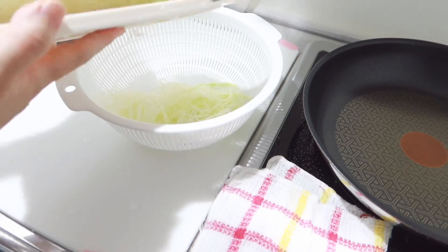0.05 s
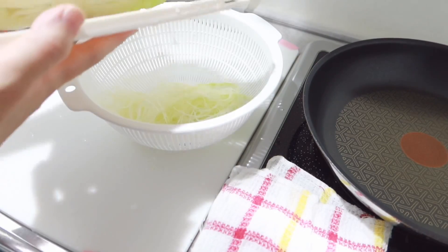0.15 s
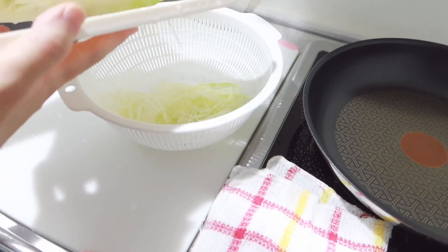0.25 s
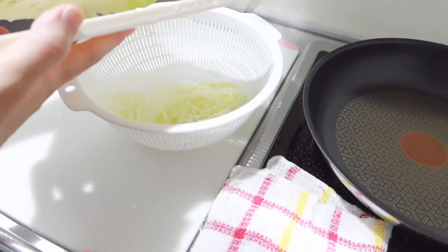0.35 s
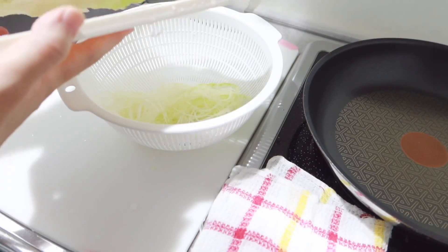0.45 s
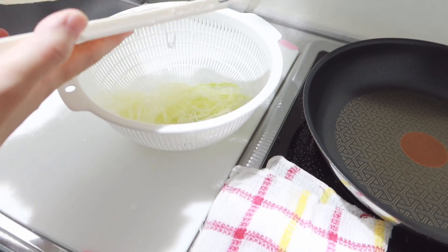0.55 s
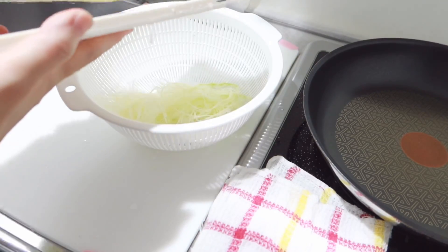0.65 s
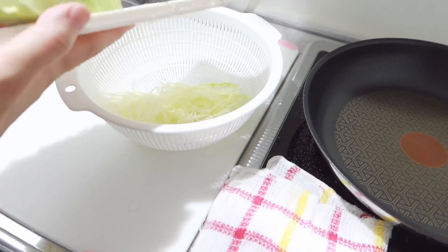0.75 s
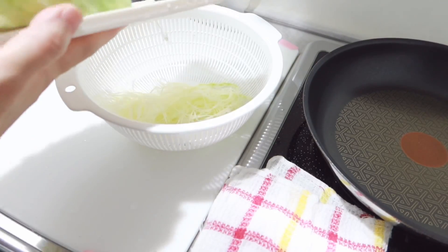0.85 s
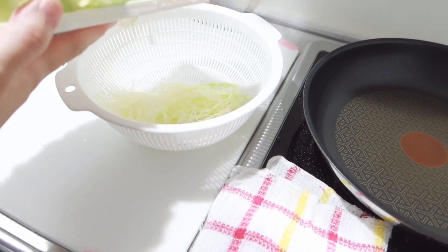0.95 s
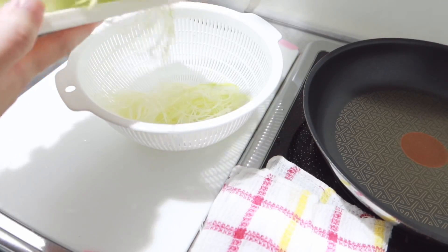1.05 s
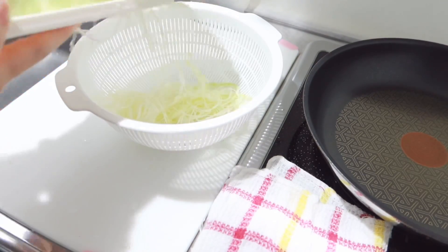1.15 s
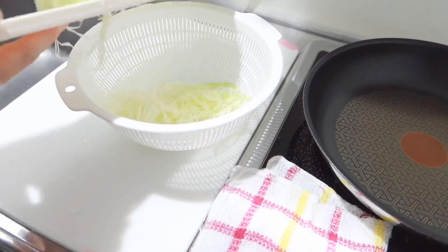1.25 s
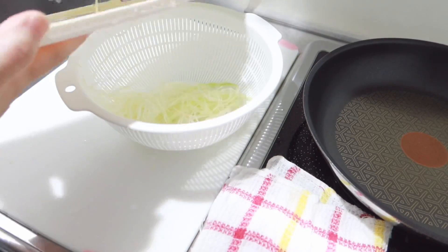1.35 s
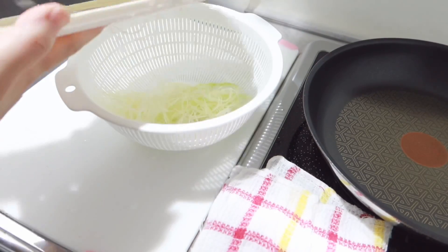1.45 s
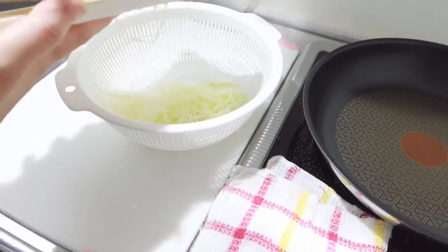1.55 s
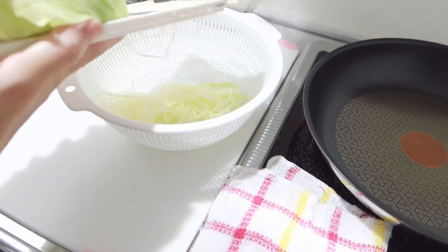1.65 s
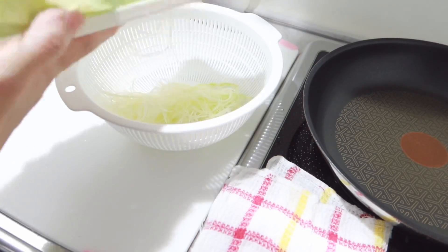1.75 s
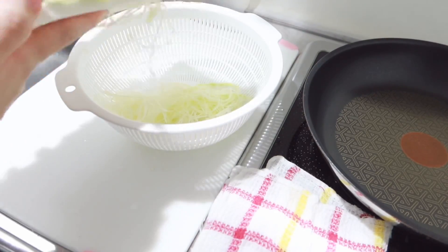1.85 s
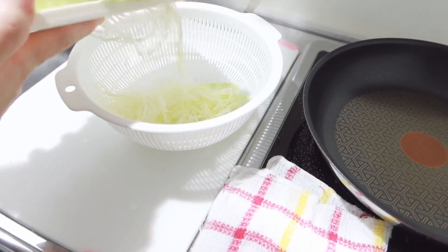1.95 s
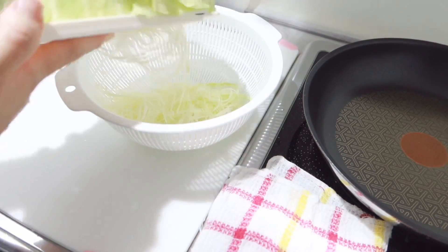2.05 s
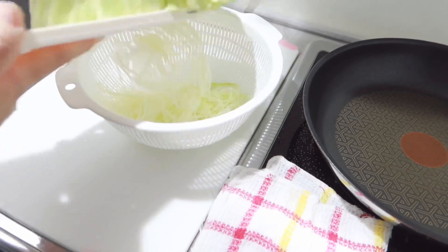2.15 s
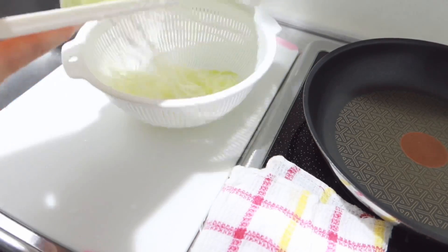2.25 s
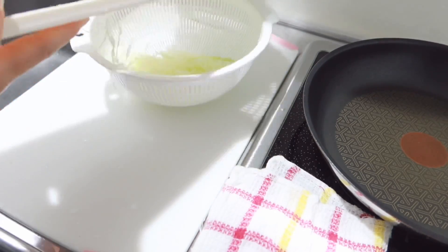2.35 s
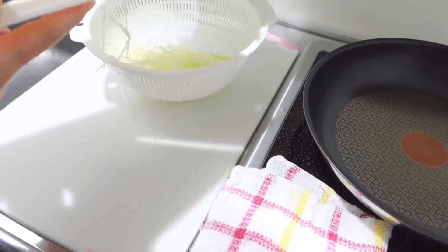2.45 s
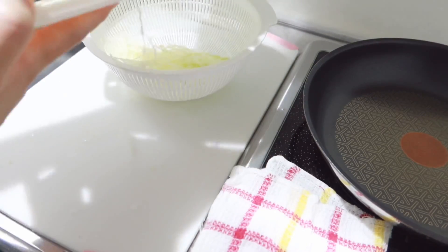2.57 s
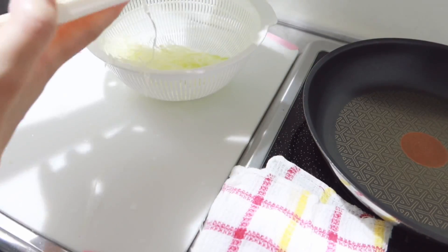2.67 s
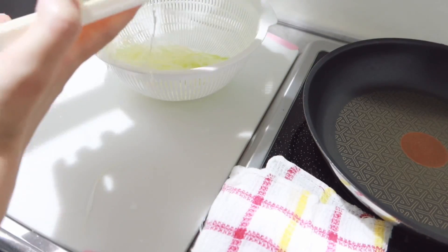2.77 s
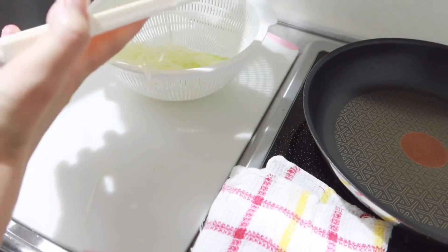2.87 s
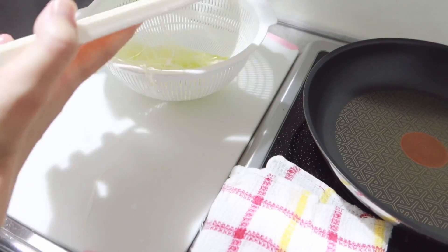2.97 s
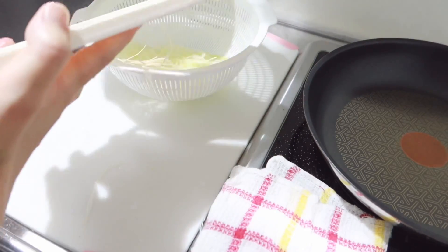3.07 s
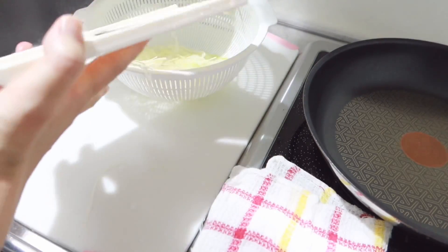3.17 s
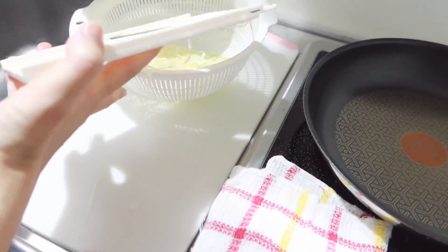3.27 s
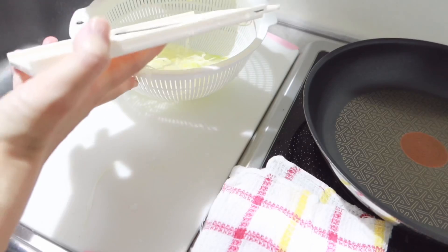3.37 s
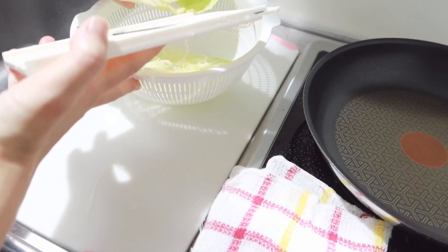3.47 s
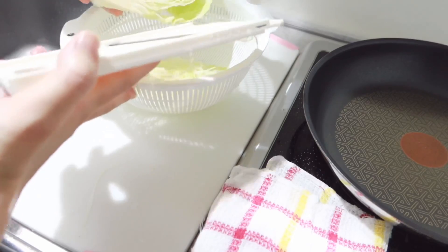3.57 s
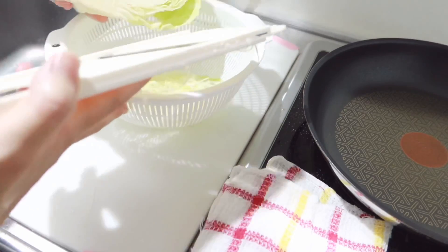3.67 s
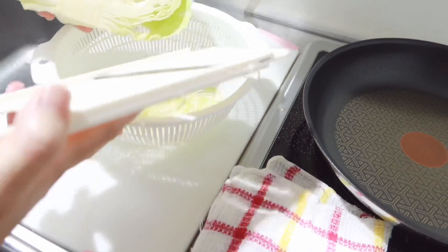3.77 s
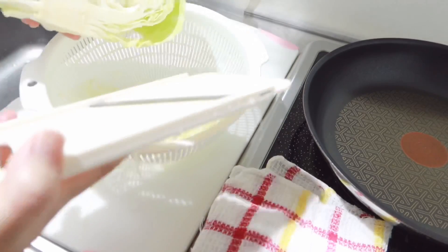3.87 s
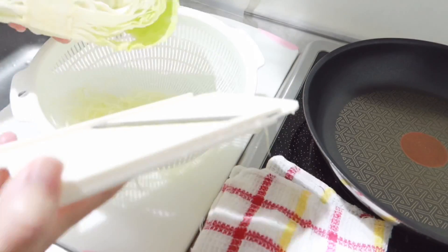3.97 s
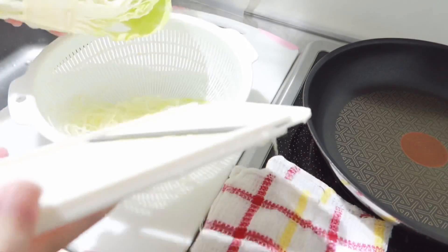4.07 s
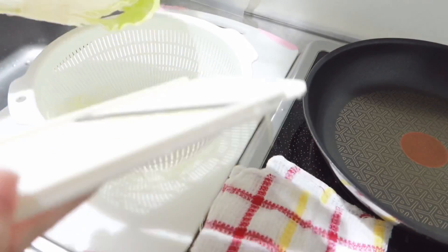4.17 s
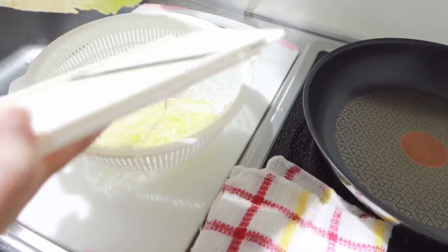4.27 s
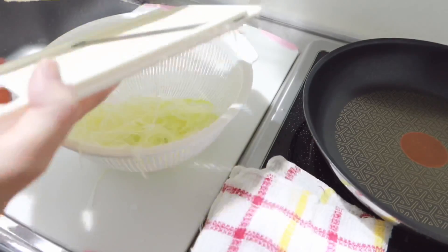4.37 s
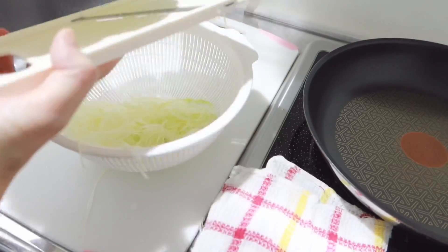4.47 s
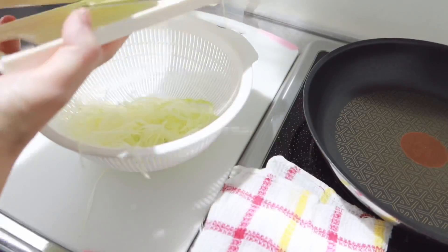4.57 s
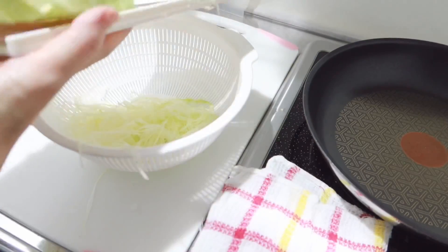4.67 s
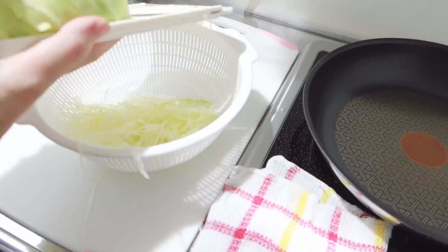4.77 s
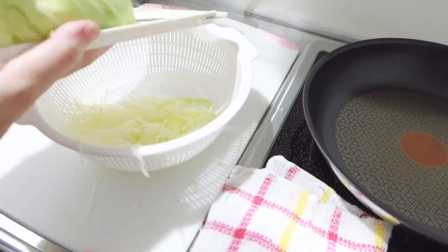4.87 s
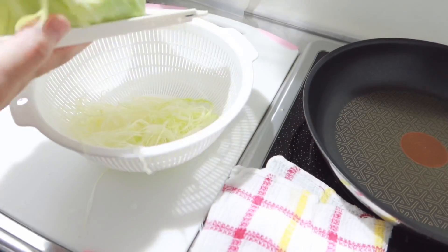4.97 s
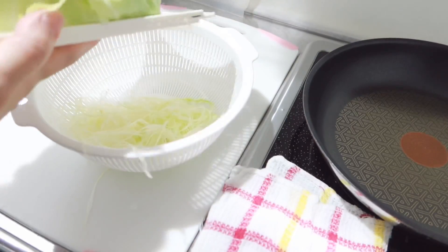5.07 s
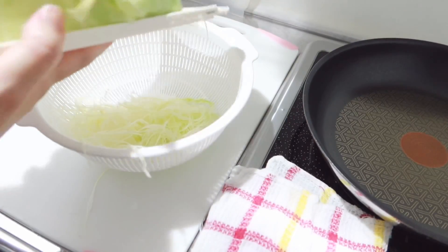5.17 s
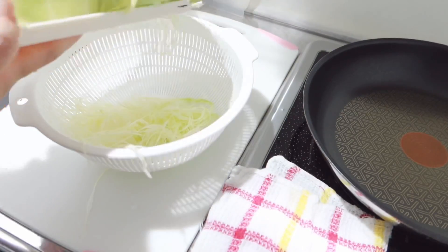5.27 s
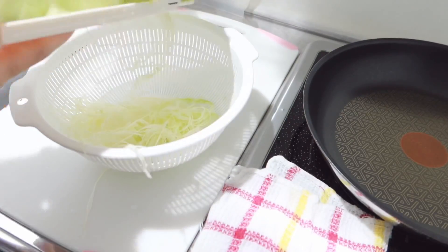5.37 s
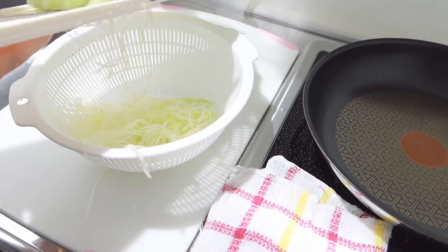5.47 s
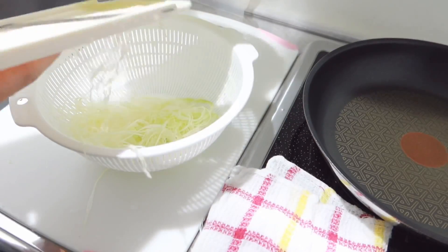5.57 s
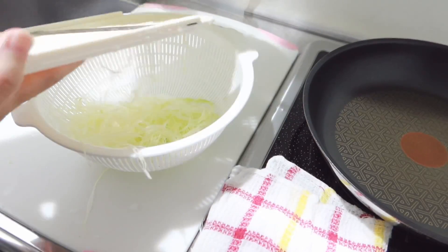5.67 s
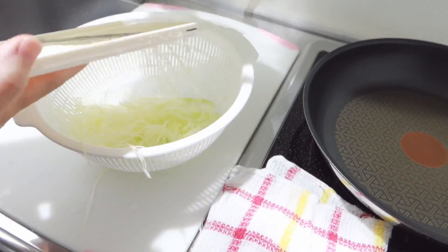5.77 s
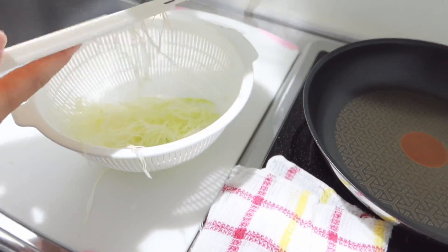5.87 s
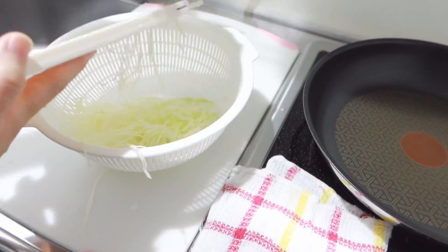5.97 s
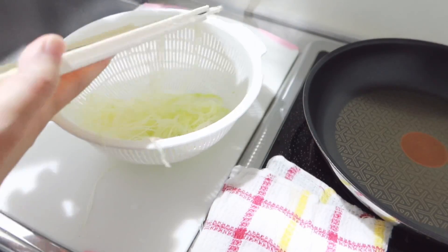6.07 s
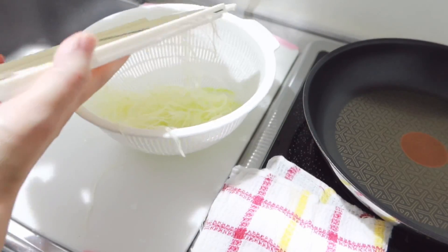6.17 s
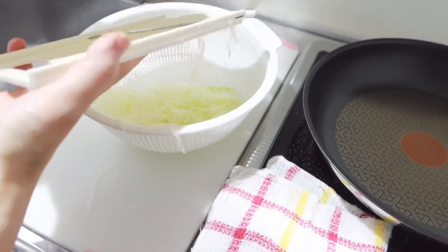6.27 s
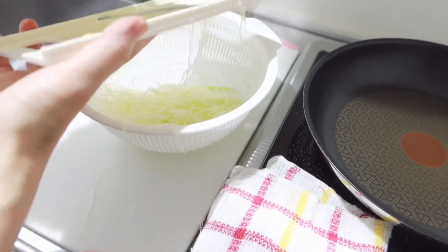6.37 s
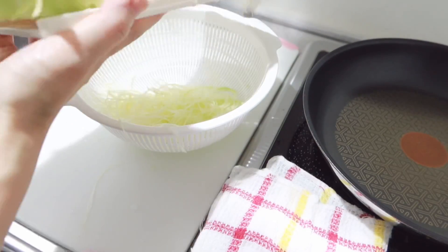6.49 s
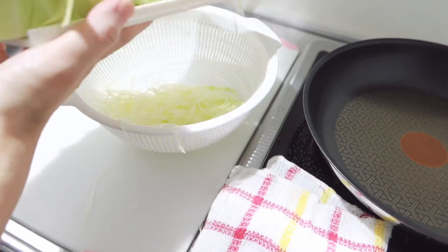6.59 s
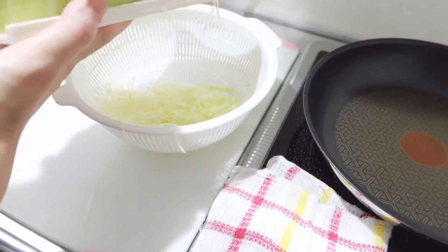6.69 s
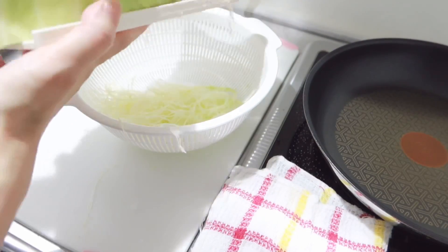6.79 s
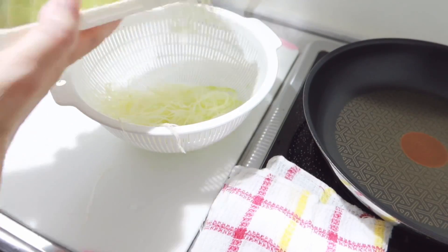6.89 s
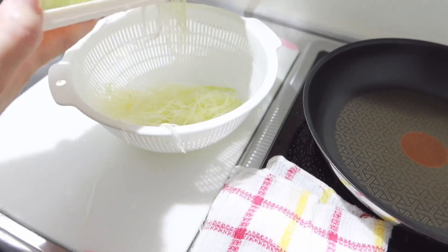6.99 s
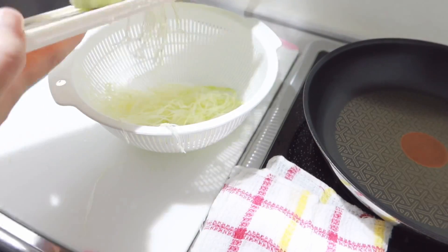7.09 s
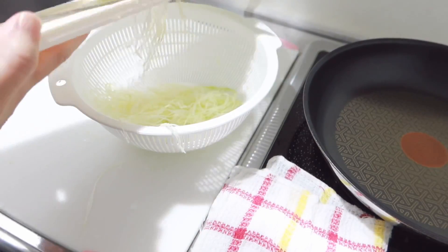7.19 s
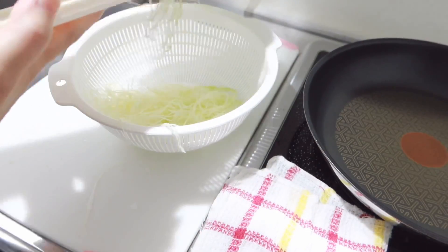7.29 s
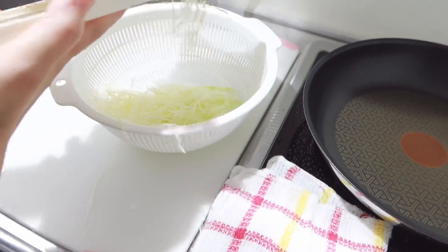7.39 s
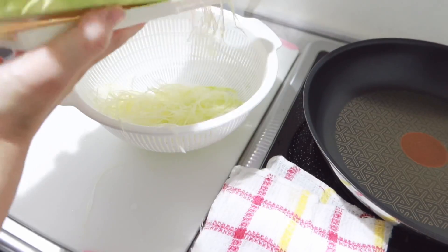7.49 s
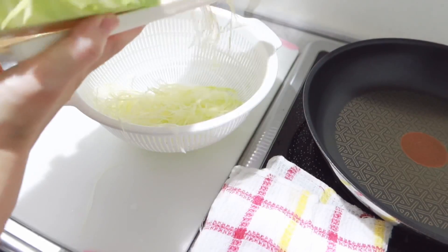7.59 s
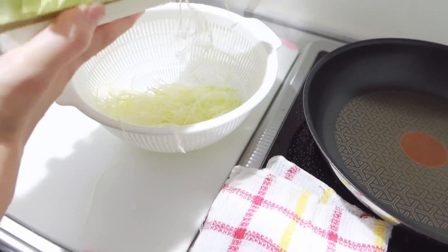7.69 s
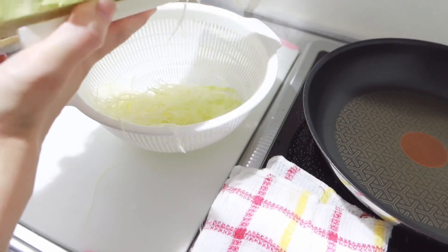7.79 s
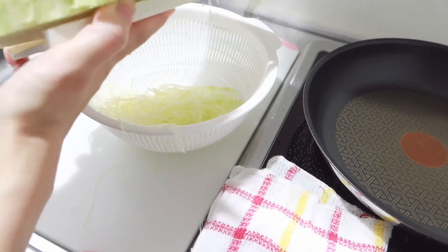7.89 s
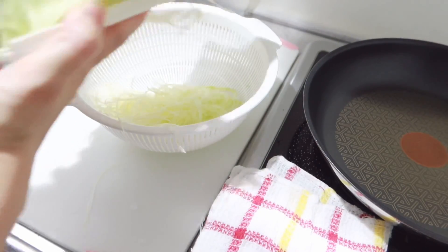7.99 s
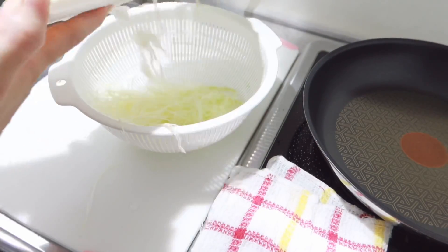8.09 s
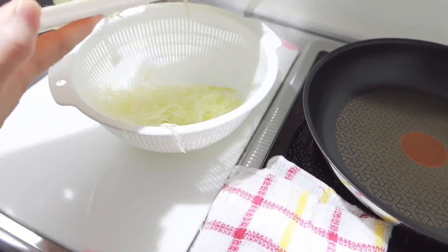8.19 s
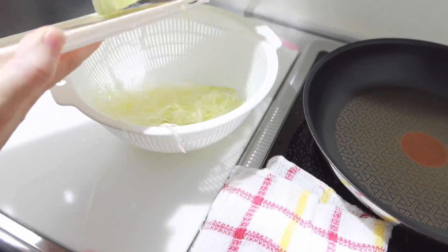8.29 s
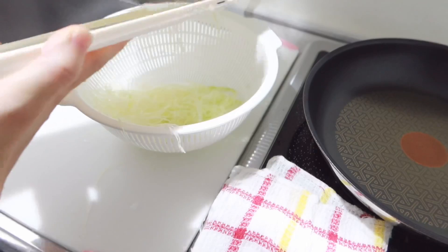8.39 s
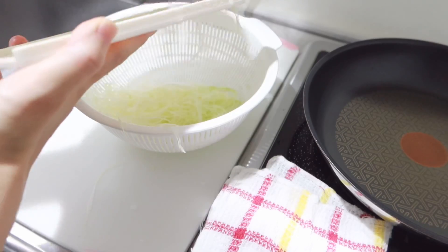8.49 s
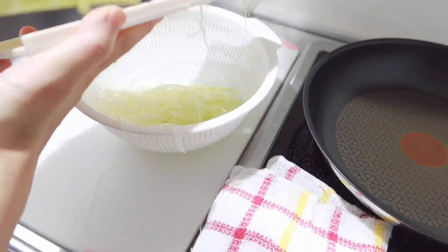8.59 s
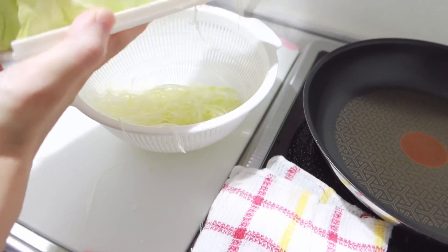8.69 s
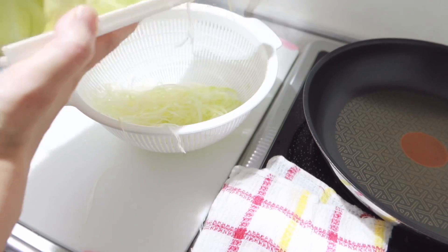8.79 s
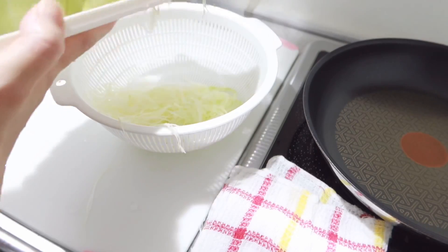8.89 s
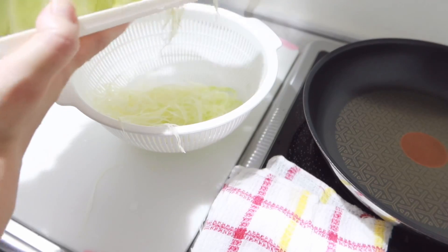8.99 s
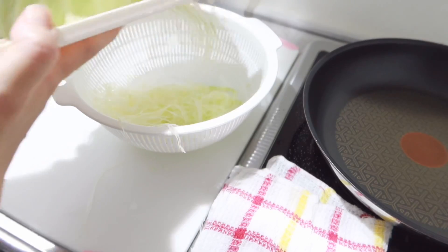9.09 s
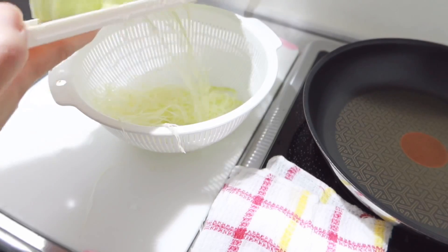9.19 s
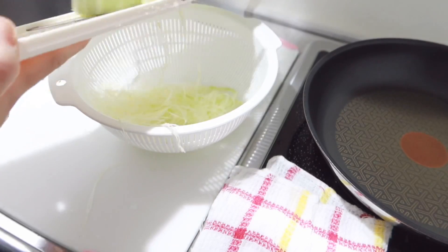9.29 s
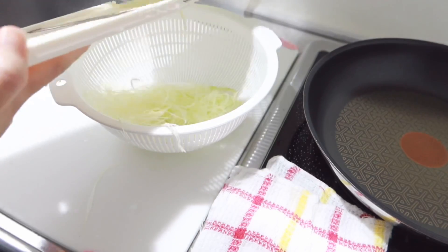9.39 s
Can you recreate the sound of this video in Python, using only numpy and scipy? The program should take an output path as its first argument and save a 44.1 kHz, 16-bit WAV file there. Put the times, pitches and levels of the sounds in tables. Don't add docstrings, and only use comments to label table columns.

```python
import sys
import numpy as np
from scipy import signal
from scipy.fft import rfft, irfft, next_fast_len
from scipy.io import wavfile
from scipy.ndimage import uniform_filter1d

SR = 44100
rng = np.random.default_rng(int(sys.argv[2]) if len(sys.argv) > 2 else 0)


def magnitude_from_level(level_db):
    exponent = np.asarray(level_db, float) / 20
    return 10 ** exponent


def output_pcm(signal):
    pcm = np.clip(np.atleast_2d(signal).T, -1, 1) * 32767
    wavfile.write(sys.argv[1], SR, np.round(pcm).astype(np.int16))


N = 416304

# frequency in Hz, level in dB per Hz.
ROOM_COLOUR = [(25, -33), (50, -14), (75, -8), (110, -12.5), (160, -10), (300, -12), (670, -17.5),
               (760, -21.5), (1200, -22), (2000, -26), (4000, -35), (11800, -50), (15000, -53.5)]
# frequency in Hz, width in Hz, level in dB.
CORNER_MODES = [(1158, 34.7, -75), (1640, 59, -75)]
# frequency in Hz, level in dB.
FRIDGE_TONES = [(59.1, -72), (73.8, -64.5), (147.7, -70), (246, -78), (295, -92)]
# time in seconds, level in dB.
FRIDGE_LEVEL = [(0, -61), (3, -61.5), (6, -64), (7.5, -67), (9.44, -65.5)]
# frequency in Hz, likeness from 0 to 1.
ROOM_LIKENESS = [(150, 0.971), (300, 0.742), (1400, 0.782), (3100, 0.44), (6800, 0.14), (15000, .1)]
# frequency in Hz, likeness from 0 to 1.
CLOSE_LIKENESS = [(150, .998), (300, .978), (700, .992), (1500, .99), (2800, .9), (6000, .7), (15000, .55)]
# frequency in Hz, lead in radians.
LEFT_LEAD = [(1500, 0.), (3000, .2), (5000, .55), (7400, .8), (9500, 1.5), (12300, 2.1), (15000, 2.7)]
# frequency in Hz, left over right in dB.
LEFT_LOUDER = [(300, .7), (1300, 1), (3000, 2.8), (5000, 2.6), (9000, 1), (15000, .1)]
# time in seconds, peak in dB, ring in Hz, ring over the crack in dB.
SNAPS = [(0.0044, -34.5, 5290, -1.5), (0.236, -36, 2470, 2.5), (0.3522, -47, 3900, 1.5),
         (0.387, -43.5, 3710, 16), (0.634, -52, 1630, -12.5), (0.7111, -30, 1630, 4.5),
         (1.245, -34.5, 1976, 18.5), (1.5524, -31, 1780, 12), (1.591, -31.5, 3480, 13),
         (1.6165, -31.5, 2370, 13), (1.8253, -26, 5600, -4), (2.7594, -52.5, 1720, -6.5),
         (3.3474, -48, 4220, 0.5), (3.988, -25.5, 2130, -12), (4.0655, -34, 1095, 10.5),
         (4.2936, -48.5, 2190, -14), (4.606, -40, 1640, 18.5), (4.8005, -34.5, 1670, -11.5),
         (4.8767, -34, 3100, 9), (5.1399, -21, 2645, 4.5), (5.3444, -54, 2200, 11),
         (6.7742, -24, 1640, -19.5), (7.9689, -22, 2790, 7.5), (7.994, -42, 2650, -3.5),
         (8.261, -32, 2800, -0.5), (8.7408, -24, 1885, 2), (9.2976, -39, 6000, 0), (9.4106, -53.5, 5600, 0)]
# frequency in Hz, level in dB per Hz.
LEAF_COLOUR = [(88, -55.5), (150, -5), (263, -22.5), (308, 2.5), (388, -9), (540, -10), (827, -5),
               (1110, -14), (1700, -2.5), (12000, -25), (15500, -21)]
# frequency in Hz, width in Hz, level in dB.
BOARD_MODES = [(330, 23.7, 8.5), (553.6, 60.5, 16), (653, 13.3, 1), (1150, 198, 10.5), (1700, 38, 1.5),
               (2280, 87, 0)]
# start, hold and release in seconds, force in dB, board boom in dB.
BITES = [(0.691, 0.0098, 0.097, -47.5, 2), (0.777, 0.209, 0.253, -42, -3), (1.55, 0.0081, 0.064, -45, -6.5),
         (1.683, 0.051, 0.041, -41.5, -5), (1.739, 0.1002, 0.104, -38.5, -2.5),
         (4.747, 0.0263, 0.034, -49, 0.5), (4.821, 0.00397, 0.074, -38.5, -3),
         (4.874, 0.1208, 0.0353, -41, -6), (5.138, 0.0569, 0.0375, -42.5, -1),
         (1.589, 0.0277, 0.0444, -49, 0.5), (6.772, 0.00856, 0.143, -38, -6), (7.601, 0.0151, .06, -43, -6),
         (7.805, 0.03, 0.0232, -49.5, -8.5), (7.871, 0.036, 0.0265, -50, -7),
         (7.91, 0.0375, 0.077, -34, -12), (8.595, 0.0376, 0.0211, -43, -10.5),
         (9.013, 0.00994, 0.268, -44.5, -10.5)]
# time in
# seconds, peak in dB, pitch in Hz.
THUDS = [(0.692, -42.5, 176), (1.551, -40.5, 329.5), (4.825, -34, 337), (5.14, -34.5, 430),
         (6.417, -36.5, 258), (6.775, -43.5, 540), (8.238, -40.5, 369.4), (8.597, -31, 487),
         (9.015, -41, 515), (2.243, -34, 235), (2.266, -29, 200), (2.31, -37, 239), (3.886, -40, 160),
         (3.93, -36.5, 150), (4.055, -39, 189), (4.801, -39, 230)]
# time in seconds, peak in dB, pitch in Hz, time to die by 60 dB in seconds.
BUMPS = [
    (1.548, -44.5, 212, 0.128),
    (2.299, -40, 63.5, 0.194),
    (4.03, -46.5, 62, 0.32),
    (8.599, -38.5, 149, 0.068),
    (9.016, -44, 131.6, 0.103),
    (6.09, -48, 94.3, 0.28),
]
# start and length in seconds, level in dB, middle pitch in Hz.
RASPS = [(0.697, 0.016, -62.5, 7000), (0.772, 0.035, -59, 4730), (1.586, 0.0339, -45, 3870),
         (1.743, 0.044, -49.5, 10500), (2.097, .15, -56, 9000), (4.858, 0.05, -46.5, 4920),
         (4.947, 0.0596, -46, 5800), (4.977, 0.0212, -39.5, 2100), (5.197, 0.245, -60.5, 6440),
         (6.453, 0.0256, -53.5, 8500), (6.592, 0.0106, -39, 2430), (6.608, 0.032, -48, 3000),
         (6.659, 0.019, -44.5, 4480), (7.396, 0.0304, -63, 6970), (7.653, 0.0294, -39.5, 3500),
         (7.913, 0.0124, -36, 1600), (7.931, 0.029, -37.5, 1700), (7.43, 0.046, -64, 9000),
         (8.608, 0.033, -41.5, 2410), (3.986, 0.033, -48, 1150), (5.34, 0.0397, -53, 2500),
         (6.86, 0.0286, -52, 3000), (8.6, 0.0386, -51, 5900), (9.04, 0.23, -61, 10000),
         (9.13, 0.069, -50.5, 7400)]
# start, rise and release in seconds, force in dB, board boom in dB.
SWELLS = [(.758, 0.019, 0.01885, -46, 1.5), (1.228, 0.021, 0.063, -49, 4), (1.53, .02, 0.014, -54, 2),
          (6.521, 0.0157, .04, -39, -1.5), (6.655, 0.0146, 0.027, -36.5, -9),
          (6.452, 0.0144, 0.0302, -56.5, -21.5), (4.657, .01, 0.046, -50.5, -1.5),
          (6.415, 0.02505, 0.053, -44, -3.5), (6.6, 0.027, 0.06, -43.5, -4), (11, .012, 0.036, -54, -4),
          (4.856, 0.022, 0.017, -46, -8), (7.648, .024, 0.055, -34, -7.5)]
# time in seconds, peak in dB, ring in Hz.
CRUNCHES = [(0.7635, -30, 1640), (0.7759, -25, 1840), (0.7964, -30, 1890), (0.94, -23.5, 1670),
            (0.9724, -30.5, 1630), (1.1528, -34.5, 1200), (1.2885, -45.5, 2200), (1.3846, -58, 1500),
            (1.7384, -29, 1640), (1.7744, -26.5, 1750), (2.0145, -42, 2940), (2.0596, -40.5, 2320),
            (2.2431, -30, 1240), (2.3994, -52, 1250), (4.8604, -27.5, 1210), (4.8994, -23, 2760),
            (4.9794, -22, 2050), (4.9924, -23.5, 2110), (5.1686, -33.5, 1860), (5.1899, -41, 1710),
            (6.4333, -36, 1890), (6.4586, -35.5, 1640), (6.595, -30, 2390), (6.6162, -30, 2370),
            (6.6276, -33.5, 1200), (6.6608, -23.5, 2560), (6.7942, -25.5, 1620), (6.8316, -35.5, 1740),
            (7.6026, -33.5, 1490), (7.664, -21.5, 4890), (7.9159, -18, 1640), (7.9351, -27, 1750),
            (7.9438, -25.5, 1380), (8.2189, -36, 2080), (8.5988, -27.5, 2310), (8.8154, -25.5, 1786),
            (8.9097, -27, 1890), (9.0154, -32.5, 1910), (9.0317, -30.5, 2140), (9.1466, -26, 2975),
            (9.1716, -29, 4780), (9.2599, -39.5, 1870), (9.3143, -48, 1850)]
# start and length in seconds, start and end pitch in Hz, level in dB.
SQUEAKS = [(0.873, 0.0442, 330, 319, -41), (1.735, 0.0141, 478, 517, -39),
           (1.816, 0.0185, 1150, 1090, -37.5), (1.923, 0.0154, 4170, 4170, -56),
           (1.98, 0.02, 3000, 2920, -55.5), (2.109, 0.0712, 702, 689.3, -46),
           (3.843, 0.045, 1640, 1640, -58.5), (4.981, 0.014, 2877, 1803, -44.5),
           (6.611, 0.0468, 464.7, 696, -49), (6.665, 0.0193, 562, 668, -40),
           (7.915, 0.0171, 576.5, 540, -41), (7.938, 0.0217, 540, 577, -41),
           (8.162, 0.0391, 1254, 1265, -46), (8.611, 0.0278, 2268, 2512, -44),
           (8.9, 0.013, 3846, 3660, -50), (9.036, 0.0125, 5910, 7050, -47.5),
           (9.166, 0.0277, 4830, 4810, -51), (9.132, 0.0126, 6110, 4500, -46.5),
           (9.142, 0.011, 3491, 2720, -43)]
# start and length in seconds, force at the start and at the end in dB, board boom in dB.
PASSES = [(1.098, 0.1254, -62.5, -54.5, 3), (1.893, 0.0964, -51.5, -50, -3.5),
          (2.057, 0.1257, -49, -42.5, -5), (5.202, 0.2703, -53, -51, -1.5), (6.553, 0.0304, -55, -51, -5.5),
          (6.878, 0.1997, -57.5, -53.5, -0.5), (7.428, 0.0816, -50, -54, -3), (8.011, 0.23, -54, -47.5, -7),
          (8.646, 0.0572, -65.5, -54.5, 1), (8.742, 0.1579, -49, -47, -5),
          (9.127, 0.1493, -52.5, -49.5, -2)]
# start, rise and fall in seconds, level in dB, drone in Hz.
NUDGES = [(2.08, 0.2044, 0.21, -42.5, 193), (3.42, 0.13, 0.22, -47, 196.5), (3.6, .13, 0.095, -51, 220.7),
          (3.56, 0.201, .07, -54, 521), (3.78, 0.1105, 0.17, -46, 157.7), (3.92, 0.1004, .12, -44, 156),
          (4.76, 0.134, 0.11, -44, 187), (5.94, 0.1507, .2, -43, 220.7), (2.225, 0.038, .12, -42, 235),
          (5.99, 0.095, .14, -50, 538), (3.4, 0.077, 0.107, -55, 531), (3.86, 0.085, 0.068, -48.5, 156)]
# start, rise and fall in seconds, level in dB, hiss in dB.
SCUFFS = [
    (2.17, 0.039, 0.2085, -39, -11.5),
    (3.39, 0.191, 0.23, -46, -16),
    (3.64, 0.077, 0.0673, -56.5, -28),
    (3.79, 0.053, 0.15, -55.5, -19),
    (3.987, 0.00272, 0.056, -45, -42.5),
    (5.95, 0.141, .14, -47, -10.5),
]
# frequency in Hz, level in dB per Hz.
COUNTER_COLOUR = [(150, -22.5), (250, -10), (768, -13), (1160, -14), (1950, -20), (2320, -21),
                  (7640, -37.5), (15500, -47.5)]
# frequency in Hz, width in Hz, level in dB.
BOWL_MODES = [(540, 33, 6), (1038, 36, 7.5), (1193.4, 78, 9), (1630, 21.5, 10), (2300, 144, 5),
              (3000, 124, 5)]
# time in seconds, peak in dB, ring in Hz.
TICKS = [(5.11, -65, 6500), (5.9621, -50.5, 4500), (2.413, -63, 7994), (7.7246, -40.5, 8910),
         (7.806, -40, 9030), (7.8144, -46, 9430), (7.823, -40.5, 9700), (7.8304, -46.5, 10100),
         (7.871, -37, 8870), (7.893, -35.5, 8500), (7.9072, -34.5, 8190)]
# start and length in seconds, start and end pitch in Hz, level in dB.
SQUEALS = [
    (4.882, 0.0354, 1477, 1567, -43.5),
    (4.947, 0.0161, 3320, 3480, -42),
    (4.955, 0.0284, 2043, 2130, -43),
    (7.654, 0.0272, 5400, 4793, -43),
]
# frequency in Hz, time to die by 60 dB in seconds.
ECHO_T60 = [(200, 0.364), (1000, 0.217), (4000, 0.18), (12000, 0.0964)]
# frequency in Hz, level in dB.
MICROPHONE_TOP = [(11000, 0), (13000, 2), (14500, -9.5), (15700, -19.5), (16200, -80)]


def evened(x):
    return x / np.sqrt(np.mean(x ** 2) + 1e-20)


def read(points, hz):
    f, value = np.transpose(points)
    return np.interp(np.log(hz + 1), np.log(f + 1), value)


def add(mix, s, sound):
    part = mix[..., round(s * SR):][..., :sound.shape[-1]]
    part += sound[..., :part.shape[-1]]


def resonate(x, hz, width):
    turn = np.exp(2j * np.pi * np.cumsum(hz * np.ones(x.shape[-1])) / SR)
    r = np.exp(-np.pi * width / SR)
    smooth = signal.lfilter([1 - r], [1, -r], x / turn + 1e-18)
    return 2 * (turn * smooth).real


def wander(count, span_s):
    width = max(int(span_s * SR), 2)
    return uniform_filter1d(rng.standard_normal(count), width) * np.sqrt(width)


def blurred(noise, across_hz, across_time):
    return evened(uniform_filter1d(uniform_filter1d(noise, size=across_hz, axis=0), size=across_time, axis=1))


def ports(pair, same, lean=((0, 0), (1, 0))):
    size = next_fast_len(N)
    hz = np.fft.rfftfreq(size, 1 / SR)
    left, other = rfft(pair, size)
    c = np.clip(read(same, hz), 0, 1)
    right = c * left + np.sqrt(1 - c ** 2) * other
    right = right * np.exp(-1j * read(LEFT_LEAD, hz)) * magnitude_from_level(-read(lean, hz))
    return irfft(np.array([left, right]), size)[:, :N]


def air():
    hz, t, z = signal.stft(rng.standard_normal((2, N)), SR, nperseg=2048)
    patches = blurred(rng.standard_normal(z.shape[1:]), 20, 4)
    colour = magnitude_from_level(read(ROOM_COLOUR, hz)[:, None] + 1.214 * patches)
    noise = signal.istft(z * colour, SR, nperseg=2048)[1][:, :N]
    corner = sum(magnitude_from_level(db) * evened(resonate(rng.standard_normal(N), f, w)) for f, w, db in CORNER_MODES)
    t = np.arange(N) / SR
    s, level_db = np.transpose(FRIDGE_LEVEL)
    hum_db = np.interp(t, s, level_db)
    hum = 0
    for f, db in FRIDGE_TONES:
        strength = magnitude_from_level(db + 5.0 + 1.23 * wander(N, 0.25))
        hum = hum + strength * np.sin(2 * np.pi * (f * t + rng.random() + 0.049 * wander(N, 0.12)))
    room_db = -59.5 + 0.046 * (hum_db + 64)
    return ports(magnitude_from_level(room_db) * evened(noise), ROOM_LIKENESS) + corner + hum * magnitude_from_level(hum_db + 60.0)


def snap(s, peak_db, hz, ring_db):
    crest_db, t60, edge_db, edge_t60 = -10, 0.0757, -1, 0.00546
    t = np.arange(0, .12, 1 / SR)
    soften = np.convolve([1, -1.45, .5], [1, -.5])
    crack = signal.lfilter([1, -1], soften, rng.standard_normal((2, len(t))))
    edge = magnitude_from_level(edge_db - 60 * t / edge_t60) * rng.standard_normal(len(t))
    pitches = np.geomspace(900, 6500, num=5) * rng.uniform(0.62, 1.253, size=5)
    modes = sum(evened(resonate(crack, f, 220)) for f in pitches)
    ring = magnitude_from_level(ring_db) * evened(resonate(crack, hz, 312))
    crack = evened(evened(crack) + 0.93 * evened(modes) + ring)
    fade = magnitude_from_level(-60 * t / t60) * np.minimum(1, t / 0.00077)
    return s, magnitude_from_level(peak_db + crest_db) * (edge * magnitude_from_level(-max(ring_db, 0)) + crack * fade)


def rubbing(rows, colour, modes, size_db, judder_db, patchy_db, size=512):
    grains_per_s = 5000
    s, level_db, boom_db, hiss_db = np.transpose(rows)
    t = np.arange(s[0], s[-1] + .012, 1 / SR)
    tears = magnitude_from_level(size_db * np.minimum(rng.exponential(1, len(t)), 4))
    tears = tears * (rng.random(len(t)) < grains_per_s / SR)
    grains = evened(signal.lfilter([1], [1, -.9], tears) + 1.93) * rng.standard_normal((2, len(t)))
    hz, frame_s, z = signal.stft(grains, SR, nperseg=size, noverlap=size - 128)
    colour_db = read(colour, hz) + sum(db * np.exp(-((hz - f) / w) ** 2) for f, w, db in modes)
    patches = blurred(rng.standard_normal(z.shape[:0:-1]).T, 2, 8)
    patches = patches * read([(2000, 0.64), (6000, 0.77)], hz)[:, None]
    shape = magnitude_from_level(colour_db[:, None] + patchy_db * patches)

    def power_db(lo, hi):
        band = shape[(hz > lo) & (hz < hi)]
        return 10 * np.log10((band ** 2).sum(0).mean() / len(hz))

    middle_db = power_db(750, 3500)
    boom_db = np.interp(s[0] + frame_s, s, boom_db) - power_db(280, 700) + middle_db
    hiss_db = np.interp(s[0] + frame_s, s, hiss_db) - power_db(4000, 12000) + middle_db
    tilt_db = np.outer(read([(600, 0.785), (850, 0.085)], hz), boom_db)
    tilt_db = tilt_db + np.outer(read([(2200, 0.022), (5500, 0.95)], hz), hiss_db)
    rub = signal.istft(z * shape * magnitude_from_level(tilt_db - middle_db), SR, nperseg=size, noverlap=size - 128)[1]
    edges = np.minimum(1, (t - t[0]) / 0.00155) * np.minimum(1, (t[-1] - t) / 0.012)
    level_db = np.interp(t, s, level_db)
    force = np.clip((level_db + 67.5) / 12, .3, 1.6)
    return s[0], rub[:, :len(t)] * magnitude_from_level(level_db + force * judder_db * wander(len(t), 0.004)) * edges


def stroke(rows):
    chirps_per_s, chirp_db = 50, -7
    start, rub = rubbing(rows, LEAF_COLOUR, BOARD_MODES, size_db=3.0, judder_db=0.3868, patchy_db=3.0)
    s, level_db = np.transpose(rows)[:2]
    span = s[-1] - s[0]
    for when, pitch, bend, length, size in rng.random((round(span * chirps_per_s), 5)):
        at, hz = when * span, 450 * 6 ** pitch
        db = np.interp(start + at, s, level_db) + chirp_db - 8 * size - 5 * pitch
        add(rub, *squeak(at, 0.005 + 0.012 * length, hz, hz * (0.876 + 0.204 * bend), db, -15.0))
    return start, rub


def touch(s, force_db, boom_db):
    t = np.arange(s[0], s[-1], .002)
    firm_db = np.interp(t, s, force_db) + 46
    hiss_db = -9.5 - 0.1725 * firm_db.max()
    hiss_db = hiss_db - 0.186 * (firm_db - firm_db.max())
    hiss_db = hiss_db - 0.614 * boom_db
    hiss_db = hiss_db - 4.5 * np.exp((s[0] - t) / 0.0217)
    return stroke(np.c_[t, firm_db - 46, boom_db + 0.1059 * firm_db, hiss_db])


def bite(start, hold, release, db, boom_db):
    return touch(start + np.cumsum([0, hold, release]), [db, db, db - 23], boom_db)


def thud(s, db, hz, t60=0.0574):
    t = np.arange(0, .3, 1 / SR)
    return s, magnitude_from_level(db - 60 * t / max(t60, .01)) * np.sin(2 * np.pi * hz * t) * np.minimum(1, t * hz / 0.444)


def rasp(s, length, db, hz):
    count, width = round(length * SR), 0.625 * hz
    grit = rng.standard_normal((2, count)) * magnitude_from_level(2.5 * wander(count, 0.0011))
    band = evened(resonate(resonate(grit, hz, width), hz, width))
    return s, magnitude_from_level(db) * band * signal.windows.tukey(count, .4)


def swell(start, rise, release, db, boom_db):
    return touch(start + np.cumsum([0, rise, release]), [db - 9, db, db - 23], boom_db)


def crunch(s, peak_db, hz):
    crest_db, split_db, t60, width = -11, -14, 0.0435, 800
    t = np.arange(0, .05, 1 / SR)
    split = rng.standard_normal((2, len(t)))
    burst = evened(resonate(resonate(split, hz, 3 * width), hz, width))
    burst = burst + magnitude_from_level(split_db) * split * magnitude_from_level(-60 * t / 0.0098)
    return s, magnitude_from_level(peak_db + crest_db - 60 * t / t60) * burst * np.minimum(1, t / 0.00066)


def squeak(s, length, from_hz, to_hz, db, over_db=-26):
    count = round(length * SR)
    hz = np.geomspace(from_hz, to_hz, count) * (1 + 0.0387 * wander(count, 0.00081))
    turns = 2 * np.pi * np.cumsum(hz) / SR
    overtones = np.sin(2 * turns) + np.sin(3 * turns) * (hz < 3000)
    tone = np.sin(turns) + magnitude_from_level(over_db) * overtones
    return s, magnitude_from_level(db + 4.5 + 3.0 * wander(count, 0.0061)) * tone * signal.windows.tukey(count, .6)


def light_pass(start, length, from_db, to_db, boom_db):
    return touch(start + np.cumsum([0, length, .045]), [from_db, to_db, to_db - 23], boom_db)


def push(start, rise, fall, bend):
    u = np.linspace(-1, 1, num=21)
    return start + rise + np.where(u < 0, rise, fall) * u, -25.5 * abs(u) ** bend


def nudge(start, rise, fall, db, drone_hz):
    s, arch_db = push(start, rise, fall, 2.29)
    t = np.arange(s[0], s[-1], 1 / SR)
    hz = np.interp(t, s, drone_hz + 0 * s)
    drone = resonate(resonate(rng.standard_normal((2, len(t))), hz, 90.5), hz, 173.0)
    drone /= np.sqrt(uniform_filter1d(drone ** 2, size=2000, axis=1)) ** 0.244
    return s[0], evened(drone) * magnitude_from_level(np.interp(t, s, db + arch_db)) * signal.windows.tukey(len(t), .1)


def scuff(start, rise, fall, db, hiss_db):
    s, arch_db = push(start, rise, fall, 1.558)
    rows = np.c_[s, db + arch_db, -3.5 - .5 * arch_db, hiss_db + 0 * s]
    return rubbing(rows, COUNTER_COLOUR, BOWL_MODES, size_db=0.8, judder_db=0.82, patchy_db=4, size=1024)


def tick(s, peak_db, hz):
    t = np.arange(0, .02, 1 / SR)
    steel = magnitude_from_level(-60 * t / 0.00222) * np.sin(2 * np.pi * hz * t)
    board = magnitude_from_level(-2.0 - 60 * t / 0.0057) * np.sin(2 * np.pi * 2300 * t)
    return s, magnitude_from_level(peak_db + 4) * (steel + board)


def squeal(s, length, from_hz, to_hz, db):
    return squeak(s, length, from_hz, to_hz, db, over_db=-5)


def kitchen(x):
    taps = np.zeros((2, SR // 2))
    at = np.arange(200, SR // 2 - 20, 20)
    at = at + rng.integers(0, 20, (2, len(at)))
    np.put_along_axis(taps, at, rng.choice([-1., 1.], at.shape), 1)
    hz, t, z = signal.stft(taps, SR, nperseg=256)
    tail = signal.istft(z * magnitude_from_level(-60 * t / read(ECHO_T60, hz)[:, None]), SR, nperseg=256)[1]
    return signal.oaconvolve(x, tail / np.linalg.norm(tail[0]), axes=1)[:, :N]


def scene():
    near = np.zeros((2, N))
    sources = ((snap, SNAPS), (bite, BITES), (thud, THUDS), (thud, BUMPS), (rasp, RASPS), (swell, SWELLS),
               (crunch, CRUNCHES), (squeak, SQUEAKS), (light_pass, PASSES), (nudge, NUDGES),
               (scuff, SCUFFS), (tick, TICKS), (squeal, SQUEALS))
    for sound, table in sources:
        for row in table:
            add(near, *sound(*row))
    echo = magnitude_from_level(-15) * kitchen(near[[0, 0]])
    return ports(near + echo, CLOSE_LIKENESS, LEFT_LOUDER) + air()


def low_pass(x):
    return signal.sosfilt(signal.butter(12, 15710, fs=SR, output="sos"), x)


def record(dry):
    size = next_fast_len(N)
    roll_off = magnitude_from_level(read(MICROPHONE_TOP, np.fft.rfftfreq(size, 1 / SR)))
    dull = irfft(rfft(dry, size) * roll_off, size)[:, :N]
    mix = 0.11276 * np.tanh(dull / 0.10725)
    return low_pass(mix)


dry = scene()
out = record(dry)
output_pcm(out)
```